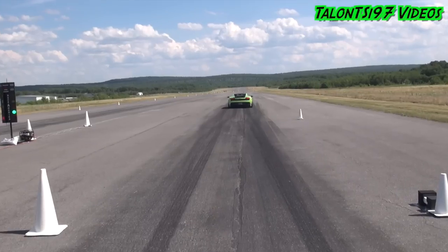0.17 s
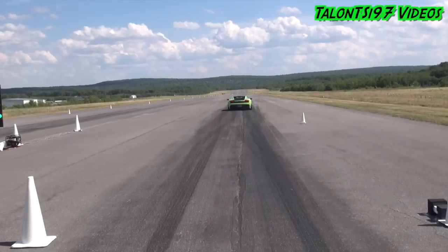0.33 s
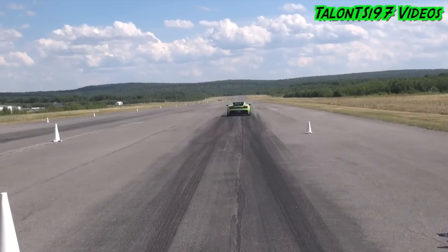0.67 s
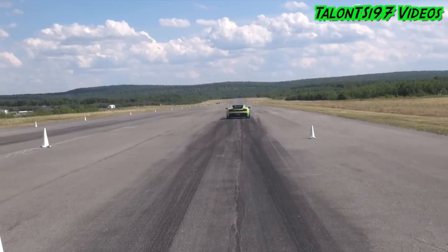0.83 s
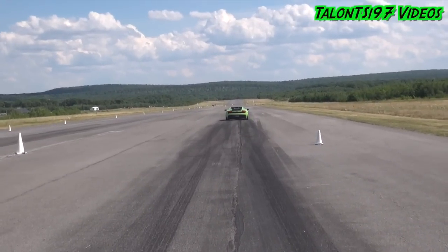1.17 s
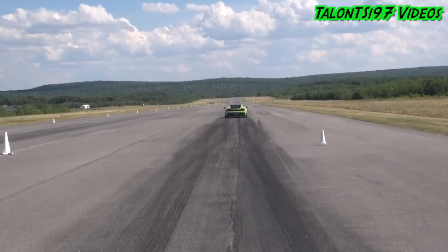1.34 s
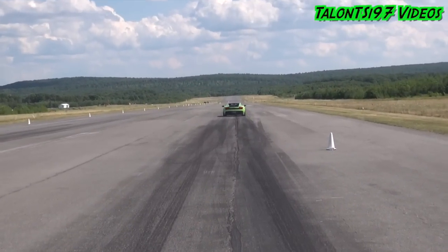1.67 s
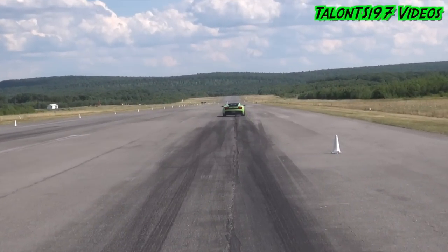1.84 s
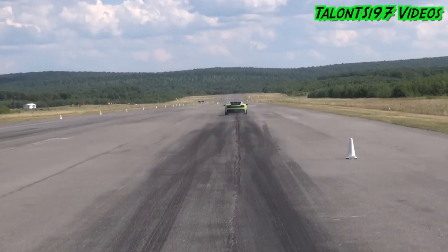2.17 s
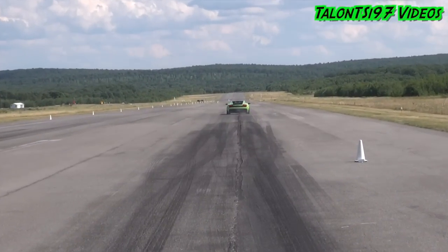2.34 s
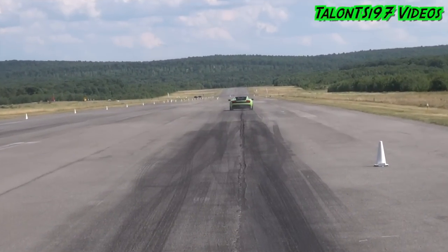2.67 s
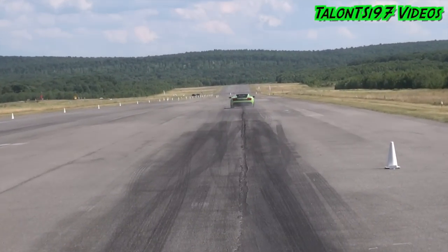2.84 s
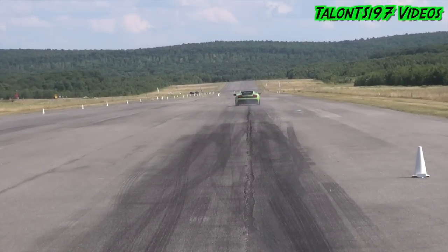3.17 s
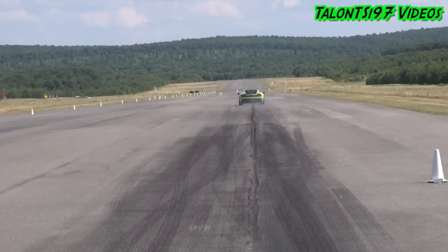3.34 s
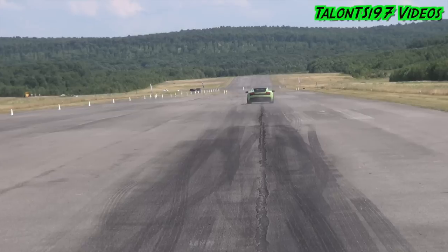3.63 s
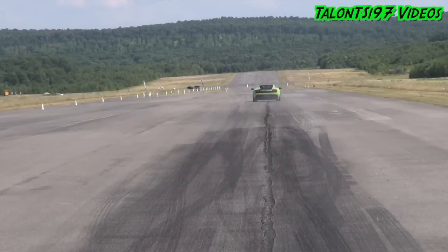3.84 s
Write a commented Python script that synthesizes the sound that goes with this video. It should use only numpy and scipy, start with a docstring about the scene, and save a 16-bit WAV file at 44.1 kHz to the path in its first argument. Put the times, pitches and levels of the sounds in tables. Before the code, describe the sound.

A ten-cylinder sports car pulls hard away down an open airstrip, its howl rising, then drops, backfires, flares briefly, backfires again and pulls on lower. A generator clatters faintly near the microphone.

```python
"""Sports car pulling away

A ten-cylinder car pulls hard, lifts off, backfires, flares, backfires again and pulls on in a higher gear.
Engine orders swept through pipe resonances make the exhaust; damped, falling swings make the bangs.
A small steady engine, probably a generator, clatters close by from cyclic noise, tones and ticks; shaped noise
is tyres and air. A gain control ducks under the peaks and creeps back."""
import sys
import numpy as np
from scipy import signal
from scipy.fft import rfft, irfft, next_fast_len
from scipy.io import wavfile
from scipy.ndimage import uniform_filter1d, map_coordinates

SR = 44100
rng = np.random.default_rng(int(sys.argv[2]) if len(sys.argv) > 2 else 0)


def unload_audio(sound):
    """Save the sound as a 16-bit wav file, at the path given as the first command line argument."""
    columns = np.transpose(np.atleast_2d(sound))
    # keep every value between -1 and 1, then stretch to whole-number steps
    steps = np.round(np.clip(columns, -1, 1) * 32767)
    wavfile.write(sys.argv[1], SR, steps.astype(np.int16))


N = 176400


def amp(db):
    """Decibels to gain."""
    return 10 ** (np.asarray(db) / 20)


def unit(x):
    """Scale to rms 1."""
    return x / np.sqrt(np.mean(x ** 2) + 1e-20)


def along(points, hz):
    """Read (frequency, value) points along a log frequency axis."""
    f, v = np.transpose(points)
    return np.interp(np.log(hz + 1), np.log(f + 1), v)


def curve(rows):
    """Draw one value per sample through (time, value) rows."""
    return np.interp(np.arange(N) / SR, *np.transpose(rows))


def wobble(rate):
    """A smooth random curve with `rate` knots a second."""
    knots = rng.standard_normal(int(N * rate / SR) + 4)
    return map_coordinates(knots, [np.arange(N) * rate / SR])


def filtered(x, response):
    """Filter x by a gain given as a function of frequency in Hz."""
    size = next_fast_len(N + 8192)  # padded so the filter's tail does not wrap round
    hz = np.fft.rfftfreq(size, 1 / SR)
    return irfft(rfft(x, size) * response(hz), size)[:N]


def noise(spectrum):
    """Coloured noise of rms 1."""
    return unit(filtered(rng.standard_normal(N), lambda hz: amp(along(spectrum, hz))))


# Engine speed; a cycle is two turns of the crank: (time [s], speed [cycles/s])
ENGINE_SPEED = [(0, 31.66), (.25, 33.6), (.5, 35.93), (.75, 38.5), (1, 41.56), (1.5, 49.2), (1.75, 53.15),
                (2.05, 59.5), (2.1, 52), (2.26, 47), (2.44, 45.8), (2.55, 61.6), (2.66, 63), (2.82, 60.5),
                (2.98, 63.3), (3, 48), (3.13, 44), (3.22, 48.3), (3.28, 47.1), (3.5, 48), (3.75, 50.1),
                (4, 53.2)]
SPEED_JITTER = 0.00072  # fraction of the speed


def engine_speed():
    """The pulls, lift-off and flare as engine speed, with a slight random waver."""
    return curve(ENGINE_SPEED) * (1 + SPEED_JITTER * wobble(25))


# Exhaust loudness, ahead of the gain control: (time [s], level [dB])
EXHAUST_LEVEL = [(0, 11.5), (.3, 11.5), (.8, 7), (1.2, 1), (1.6, -3), (2.052, -1.5), (2.072, -21.5),
                 (2.29, -18), (2.31, -21.5), (2.36, -17.5), (2.452, -21), (2.46, -8.5), (2.66, -8),
                 (2.82, -7.5), (2.972, -11.5), (2.995, -22), (3.07, -19.5), (3.12, -9.5), (3.22, -9.5),
                 (3.4, -9.5), (3.65, -10.5), (4, -12.5)]
# Strength of each engine order in each throttle state, before the pipe:
# (order [per cycle], full pull [dB], coasting [dB], flaring [dB], higher gear [dB])
ORDER_LEVELS = [(2, -2.5, -3.5, -0.5, 5), (3, -10.5, -1, -3.5, -9), (4, -32.5, -21, -13, -15),
                (5, 0.5, 1, 0.5, 3), (6, -17.5, -2, -14.5, -8.5), (7, -15.5, -19, -10.5, -11.5),
                (8, -14, -12, -14.5, -23), (9, -20.5, -11.5, -21, -46), (10, -4, -26, -1.5, -8),
                (11, -32, -30, -38.5, -36.5), (12, -25, -41, -9.5, -29.5), (13, -19.5, -24.5, -6, -40),
                (14, -22.5, -11.5, -29, -30), (15, -5, -16.5, -3, -4.5), (17, -19, -19, -25, -11),
                (20, -12, -29, -6, -9), (25, -17, -19, -17, -24), (30, -14, -18, -9.5, -14),
                (35, -19, -23, -15.5, -27), (40, -24.5, -29.5, -24, -31)]
# Throttle: (start time [s], state [0 full pull, 1 coasting, 2 flaring, 3 higher gear])
THROTTLE = [(0, 0), (2.058, 1), (2.455, 2), (2.985, 1), (3.1, 3)]
# Unevenness of the firing: (time [s], amount [0-1])
ROUGHNESS = [(0, 0.12), (2.03, 0.09), (2.1, 0.1), (2.48, .8), (2.58, 0.22), (2.95, 0), (3.12, .3),
             (3.25, 0), (4, .14)]
# Response of the exhaust pipe: (frequency [Hz], gain [dB])
PIPE_RESPONSE = [(70, -56), (150, -17), (230, -15), (295, -10.5), (338, 0), (365, -5.5), (400, -16.5),
                 (460, -16.5), (530, -13.5), (600, -20.5), (720, -34), (900, -32), (1500, -38)]
# Colour of the gas rush: (frequency [Hz], relative level [dB])
RASP_SPECTRUM = [(400, -22.5), (900, 2.5), (1300, -1.5), (2300, -6.5), (3200, -17), (5000, -38),
                 (12000, -55)]
RASP_DB, SPUTTER_DB, FLUTTER_DB = -45.5, -14, 0.5
BOOM_HZ, BOOM_WIDTH_HZ = 352.5, 24  # main pipe resonance, which turns the phase of orders crossing it
PHASE_SCATTER = 0.7  # radians, random phase offset of each order, softening the pulse of each cycle


def exhaust(speed, turn):
    """Engine orders sweep through pipe resonances; throttle sets their balance, uneven firing adds sputter."""
    starts, states = np.transpose(THROTTLE)
    state_index = np.searchsorted(starts, np.arange(N) / SR, side="right") - 1
    state = states[state_index].astype(int)
    tones = np.zeros(N)
    for order, *levels in ORDER_LEVELS:
        hz = order * speed
        balance_db = uniform_filter1d(np.array(levels, float)[state], size=400)  # 9 ms crossfade
        level_db = balance_db + along(PIPE_RESPONSE, hz) + FLUTTER_DB * wobble(14)
        lag = np.arctan((hz - BOOM_HZ) / BOOM_WIDTH_HZ)
        scatter = PHASE_SCATTER * rng.standard_normal()
        tones += amp(level_db) * np.cos(order * turn - lag - .8 + scatter)

    # both noises pulse five times an engine cycle
    sputter = noise([(60, -28), (150, 1), (330, 5), (550, -6.5), (800, -14.5), (2000, -37.5), (6000, -71.5)])
    sputter *= 1 + .6 * np.cos(5 * turn)
    rasp = amp(RASP_DB) * noise(RASP_SPECTRUM)
    rasp *= 1 + .8 * np.cos(5 * turn)
    rough_sputter = amp(SPUTTER_DB) * curve(ROUGHNESS) * sputter
    return amp(curve(EXHAUST_LEVEL)) * (np.sqrt(2) * tones + rough_sputter + rasp)


# Brief whines: (start time [s], end time [s], order [per engine cycle], level [dB])
ENGINE_WHINES = [(0.028, 0.228, 91, -37.5), (1.306, 1.467, 91.2, -49.5), (1.34, 1.48, 61.3, -43.5)]


def whines(turn):
    """Thin sine tones locked to engine speed swell and vanish."""
    t, out = np.arange(N) / SR, np.zeros(N)
    for start, end, order, db in ENGINE_WHINES:
        progress = np.clip((t - start) / (end - start), 0, 1)
        out += amp(db) * np.sin(np.pi * progress) * np.sin(order * turn)
    return out


# Backfires and burbles: (time [s], level [dB], first pitch [Hz])
BACKFIRES = [(2.3255, 16.5, 352), (2.4565, -6, 220.2), (2.463, -1, 278), (2.4797, -11.5, 220),
             (3.0833, 18.5, 376), (3.0933, 12, 201.8)]
# Colour of the crack and scatter: (frequency [Hz], relative level [dB])
CRACK_SPECTRUM = [(100, -4.5), (200, 17), (600, 3.5), (1300, -6), (2500, -13.5), (5000, -23.5),
                  (9000, -40.5), (15000, -53.5)]
BANG_END_HZ, BANG_SAG_S, BANG_T60_S, BANG_RISE_S = 145, 0.0032, 0.024, .001
CRACK_DB, CRACK_T60_S = -14.5, 0.025  # level relative to the bang
SCATTER_DB, SCATTER_T60_S = -32.5, 0.19  # level relative to the bang
BANG_LOW_HZ = 110  # the microphone picks up little deep bass


def backfires():
    """Each bang is a damped swing of falling pitch with a noise crack and a faint, longer scatter."""
    swings, burst = np.zeros(N), np.zeros(N)
    for start, db, first_hz in BACKFIRES:
        t = np.maximum(np.arange(N) / SR - start, 0)
        strength = amp(db) * (1 - np.exp(-t / BANG_RISE_S))
        # pitch sags exponentially from first_hz to BANG_END_HZ
        sag_cycles = (first_hz - BANG_END_HZ) * BANG_SAG_S * (1 - np.exp(-t / BANG_SAG_S))
        cycles = BANG_END_HZ * t + sag_cycles
        swings += strength * amp(-60 * t / BANG_T60_S) * np.sin(2 * np.pi * cycles)
        crack = amp(CRACK_DB - 60 * t / CRACK_T60_S)
        scatter = amp(SCATTER_DB - 60 * t / SCATTER_T60_S)
        burst += strength * (crack + scatter)
    high_pass = signal.butter(2, BANG_LOW_HZ, "high", fs=SR, output="sos")
    return signal.sosfilt(high_pass, swings + burst * noise(CRACK_SPECTRUM))


# Clatter in each generator cycle:
# (phase [0-1], gate spread [cycles], centre [Hz], width [Hz], level [dB])
GENERATOR_TICKS = [(0, 0.056, 4000, 455, -58.5), (.19, 0.064, 2406, 727, -47),
                   (0.189, 0.068, 7250, 1476, -65), (.5, 0.087, 2600, 3390, -51.5)]
# Colour of the casing's rattle: (frequency [Hz], relative level [dB])
CASING_SPECTRUM = [(500, -21), (900, -8.5), (1300, -10), (1650, -9.5), (1900, -9), (2300, 8), (2500, -7.5),
                   (2700, 1), (3300, -17.5), (4000, -10), (5000, -20.5), (6300, -22), (6600, -18.5),
                   (6900, -27.5), (8100, -25.5), (10000, -39), (15500, -45)]
# Steady tones of the casing: (frequency [Hz], level before the RING_DB lift [dB])
CASING_TONES = [(1136, -51.5), (1437, -56), (1776, -56), (2024, -56), (2229, -56), (2358, -65), (2606, -58)]
GENERATOR_HZ, CASING_DB, RING_DB = 30.65, -45.5, 6


def generator():
    """The casing rattles alike each cycle and rings steadily; valves and firing tick at fixed phases."""
    cycles = np.arange(N) / SR * GENERATOR_HZ + .003 * wobble(5)
    size = int(SR / GENERATOR_HZ)
    # one cycle of noise, read round and round
    rattle = map_coordinates(rng.standard_normal(size), [cycles % 1 * size], mode="grid-wrap")
    out = amp(CASING_DB) * unit(filtered(rattle, lambda hz: amp(along(CASING_SPECTRUM, hz))))
    for hz, db in CASING_TONES:
        tone = np.sin(2 * np.pi * (hz * cycles / GENERATOR_HZ + rng.random()))
        out += amp(db + RING_DB + 1.5 * wobble(5.5)) * tone
    for phase, spread, hz, width_hz, db in GENERATOR_TICKS:
        offset = (cycles - phase + .5) % 1 - .5  # cycles from the nearest tick
        gate = np.exp(-.5 * (offset / spread) ** 2) * amp(1.5 * wobble(30))
        ring = filtered(rng.standard_normal(N), lambda f: 1 / (1 + (2 * (f - hz) / width_hz) ** 2))
        out += amp(db) * unit(gate * ring)
    return out


# Colour of tyres and air: (frequency [Hz], relative level [dB])
AIR_SPECTRUM = [(25, -11), (70, 4), (130, 8), (400, 5), (750, -2.5), (1200, 0.5), (1750, -9.5), (2400, -7),
                (3200, -13), (5000, -27), (7500, -33.5), (10000, -41), (15500, -43.5)]
# Loudness of tyres and air, ahead of the gain control: (time [s], level [dB])
AIR_LOUDNESS = [(0, -27), (.3, -28), (.8, -29), (1.25, -31), (1.55, -32.5), (2.29, -31.5), (2.31, -49),
                (2.42, -33.5), (2.7, -31.5), (3.02, -33.5), (3.07, -34), (3.2, -26), (3.66, -32),
                (3.71, -28), (4, -35)]
# Colour of the breeze: (frequency [Hz], relative level [dB])
BREEZE_SPECTRUM = [(20, -4.5), (60, -10), (140, 5.5), (250, -8.5), (600, -36.5), (2000, -99.5)]
BREEZE_DB = -49


def air():
    """Broad tyre and air noise moves in level over the low rumble of a breeze."""
    tyres = amp(curve(AIR_LOUDNESS) + .7 * wobble(25)) * noise(AIR_SPECTRUM)
    breeze = amp(BREEZE_DB + 1.5 * wobble(6)) * noise(BREEZE_SPECTRUM)
    return tyres + breeze


def scene():
    """Mix the car, the generator and the open air."""
    speed = engine_speed()
    turn = 2 * np.pi * np.cumsum(speed) / SR  # engine cycle phase in radians
    return (exhaust(speed, turn) + whines(turn) + backfires() + generator() + air())[None]


AGC_TOP, AGC_RELEASE_DB_PER_S = 0.97, 12  # AGC_TOP is a peak amplitude, full scale 1
TOP_HZ = 15800


def record(dry):
    """Gain control with fast attack and slow release, then clipping and a band limit."""
    x = dry[0]
    over_db = 20 * np.log10(np.maximum(np.abs(x) / AGC_TOP, 1))
    over_db[0] = over_db[:SR // 20].max()  # already ducked by the running engine
    # hold each peak, letting it fall at the release rate
    release_db = AGC_RELEASE_DB_PER_S * np.arange(N) / SR
    duck_db = np.maximum.accumulate(over_db + release_db) - release_db
    duck_db = uniform_filter1d(duck_db, size=88)  # 2 ms attack
    clipped = np.clip(x * amp(-duck_db), -1, 1)
    return filtered(clipped, lambda hz: hz < TOP_HZ)[None]


dry = scene()
out = record(dry)
unload_audio(out)
```